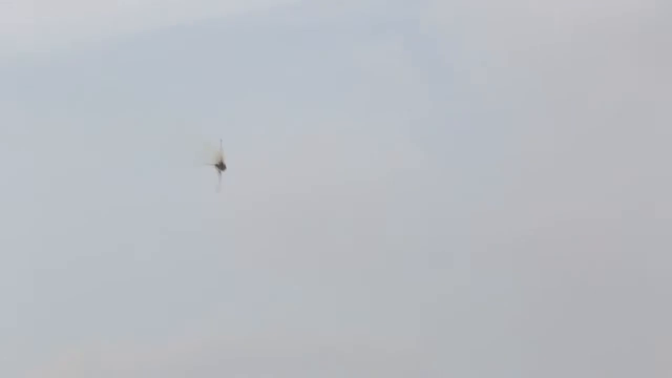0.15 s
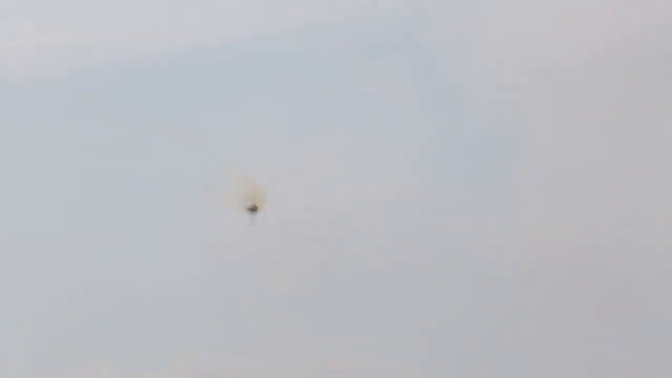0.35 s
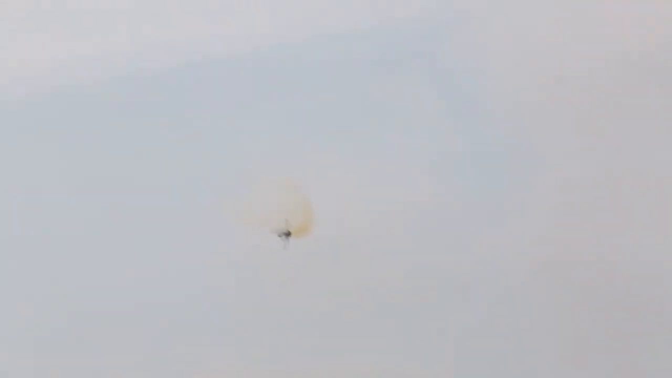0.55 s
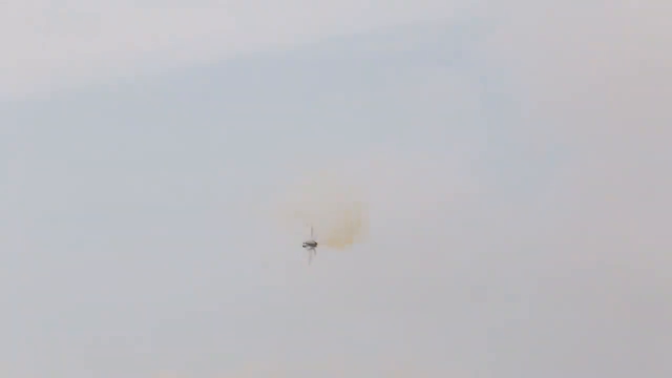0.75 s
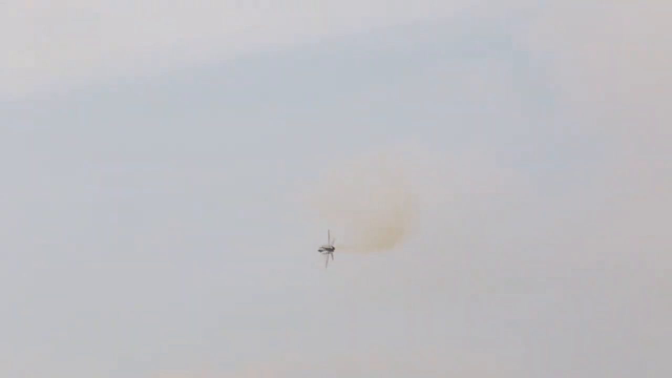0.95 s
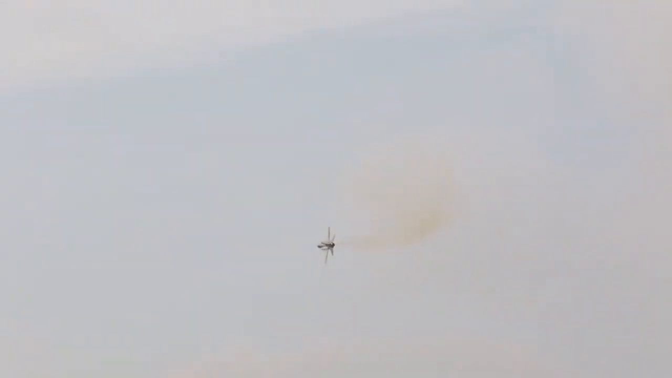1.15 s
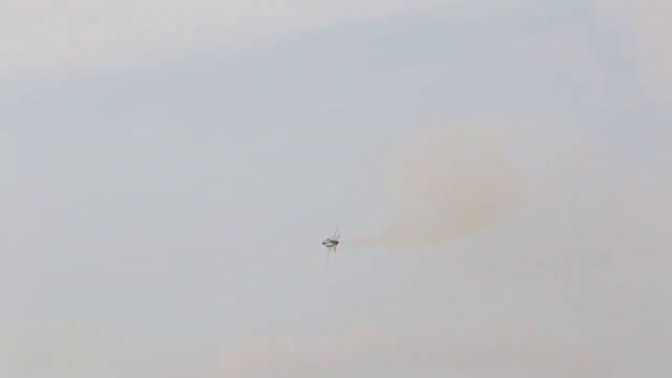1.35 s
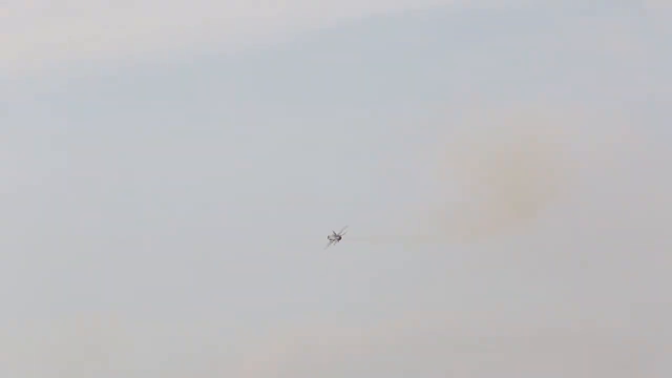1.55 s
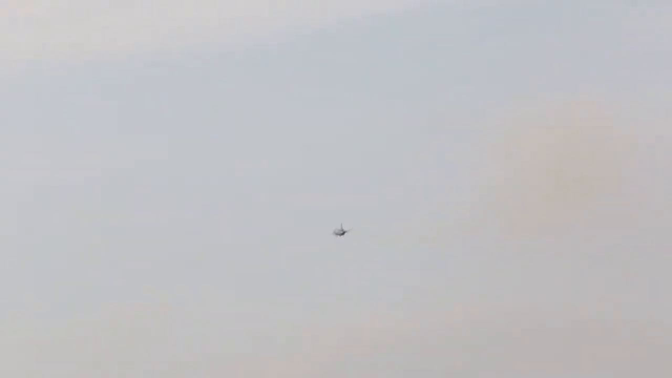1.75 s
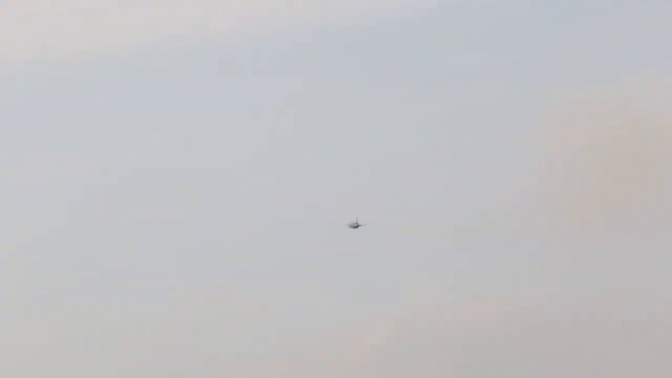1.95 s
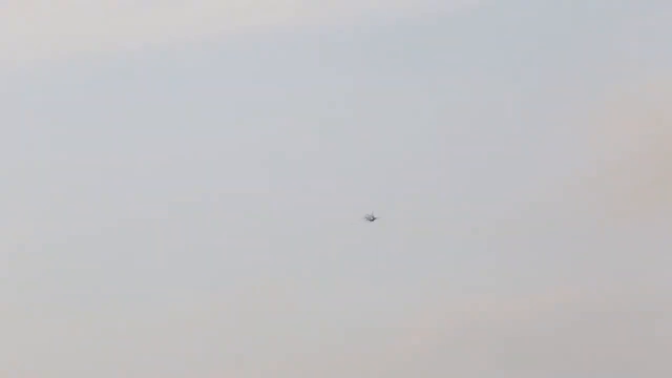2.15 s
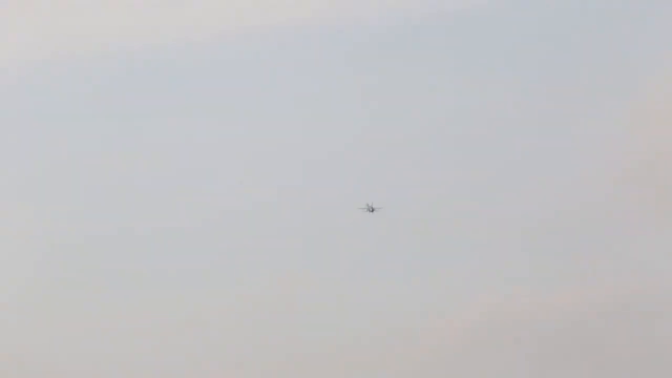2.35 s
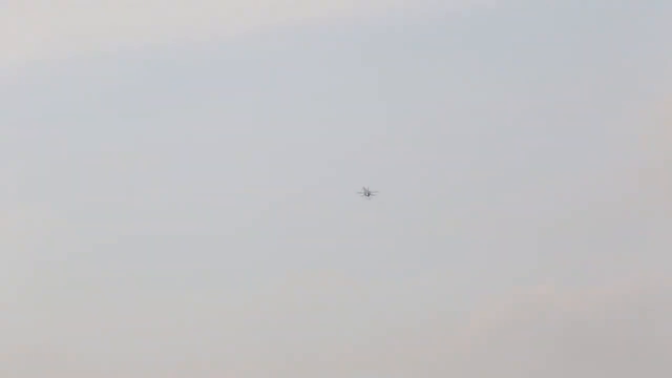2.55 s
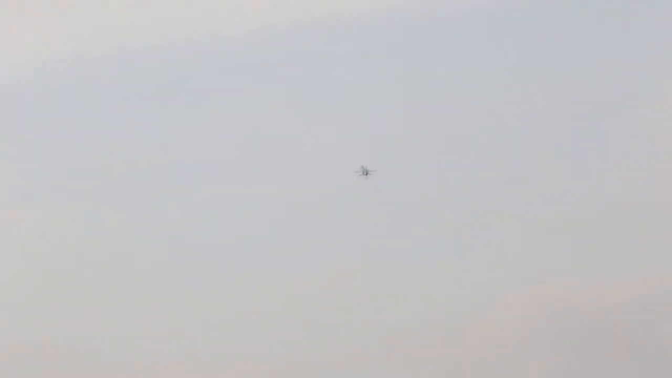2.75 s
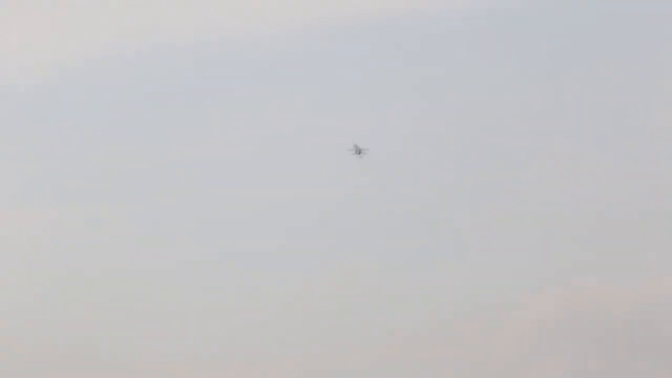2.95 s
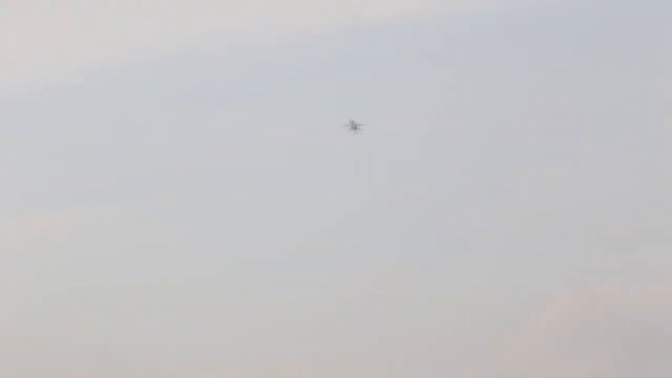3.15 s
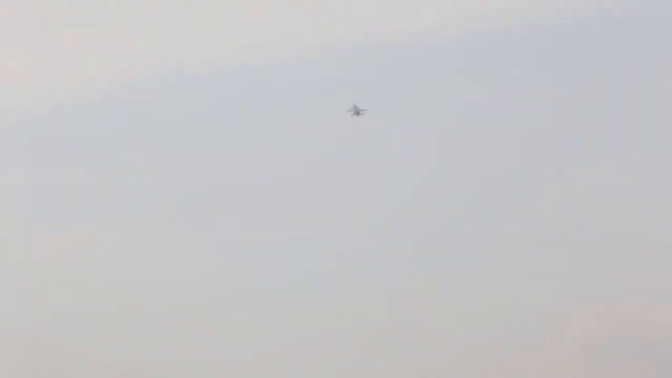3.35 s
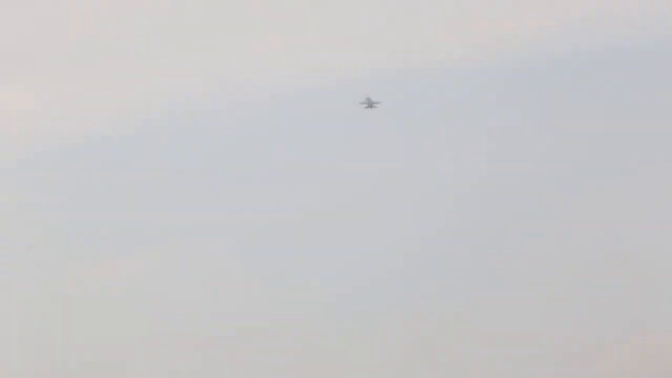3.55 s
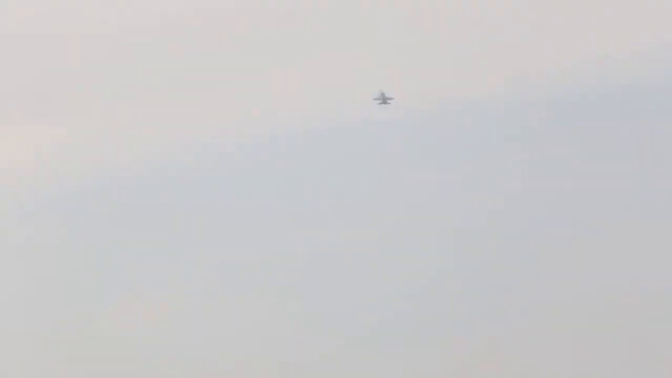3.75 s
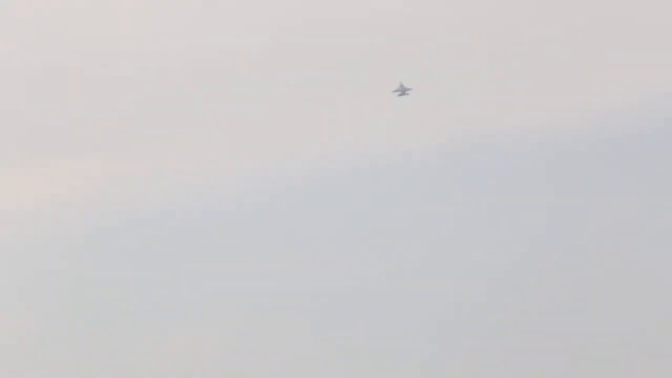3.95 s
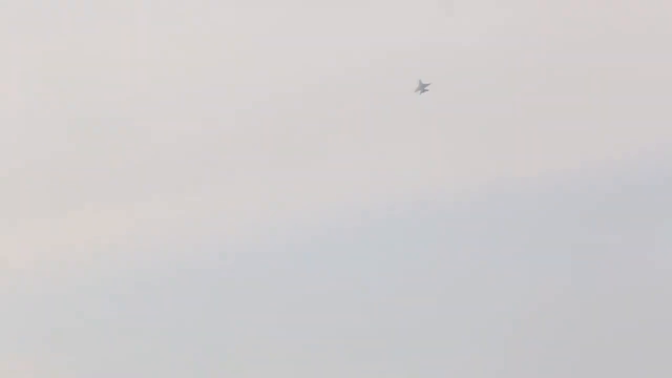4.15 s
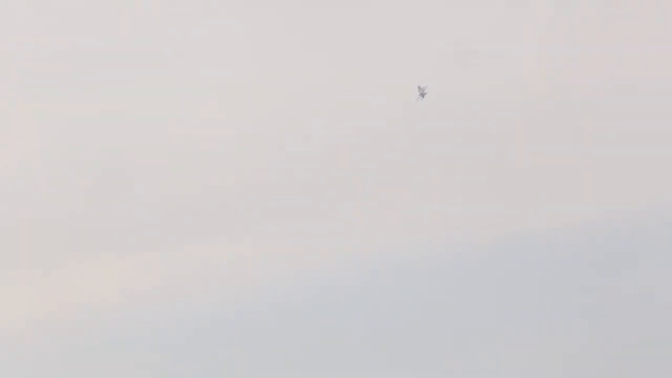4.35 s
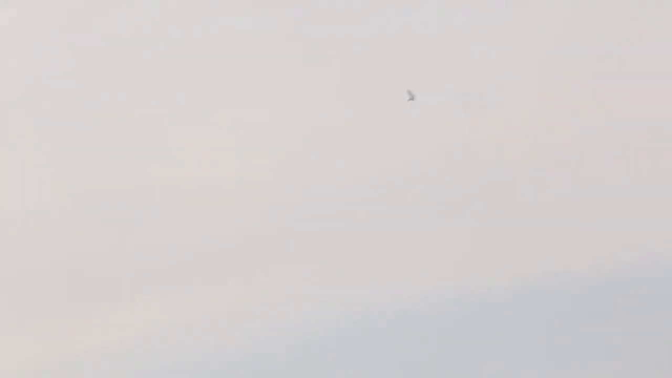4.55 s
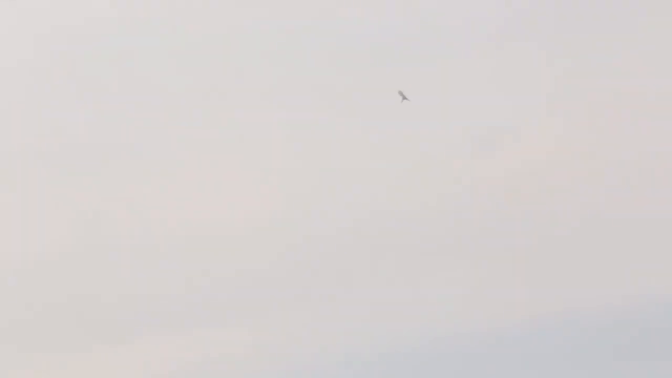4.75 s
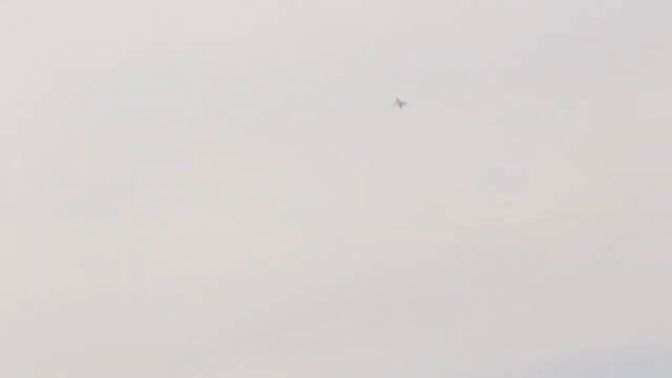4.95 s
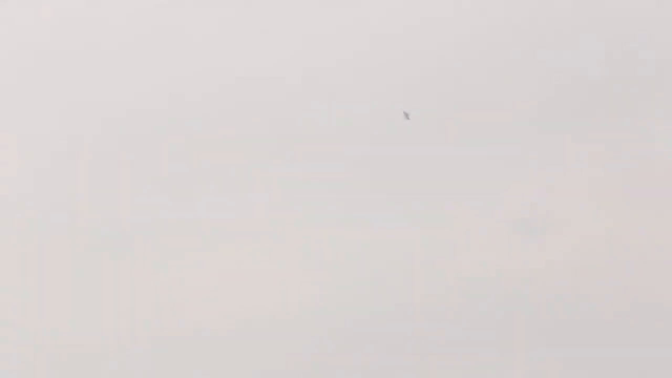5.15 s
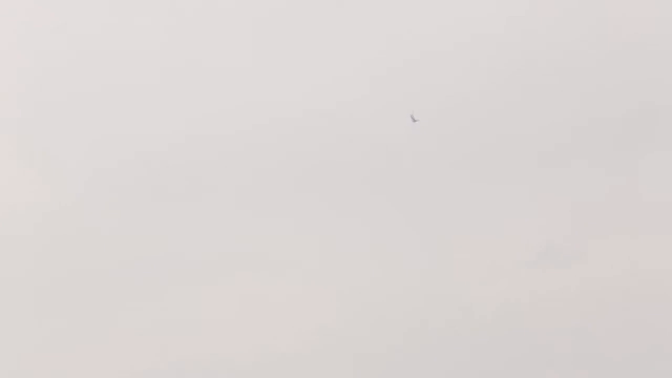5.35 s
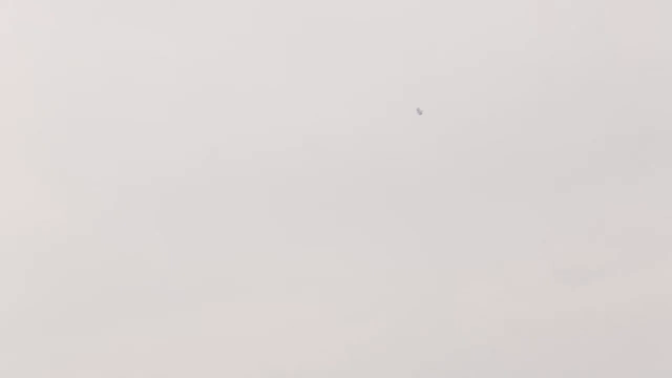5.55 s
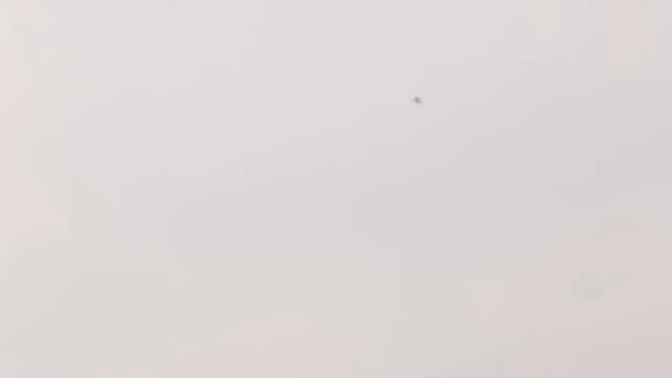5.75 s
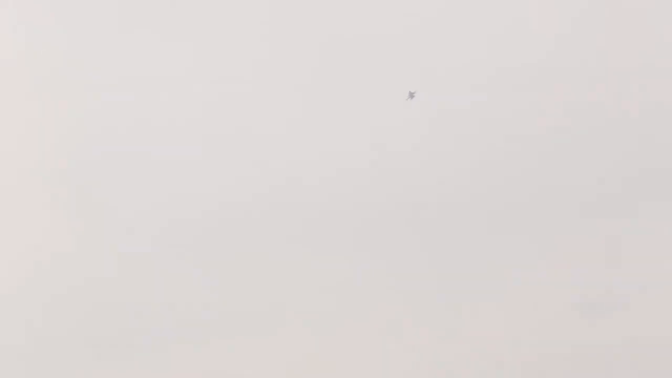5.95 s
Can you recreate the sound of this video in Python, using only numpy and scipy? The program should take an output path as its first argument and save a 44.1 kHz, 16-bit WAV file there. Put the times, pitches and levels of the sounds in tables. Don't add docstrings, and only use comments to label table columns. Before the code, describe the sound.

Just after a low pass, a jet's harsh exhaust roar snaps and crackles, dulls with distance, surges once more and sinks to rumble.

```python
import sys
import numpy as np
from scipy import signal
from scipy.fft import irfft
from scipy.io import wavfile

SR = 44100
rng = np.random.default_rng(int(sys.argv[2]) if len(sys.argv) > 2 else 0)


def int16_out(signal):
    q = np.round(np.clip(np.atleast_2d(signal).T, -1, 1) * 32767)
    wavfile.write(sys.argv[1], SR, q.astype(np.int16))


def natural_amplitude(level_db):
    exponent = np.asarray(level_db, float) / 20
    return 10 ** exponent


N = 264600


def in_time(rows, s):
    at, *columns = np.transpose(rows)
    return [np.interp(s, at, column) for column in columns]


def at_hz(points, hz):
    point_hz, point_db = np.array(points).T
    return np.interp(np.log(hz + 1), np.log(point_hz), point_db)


def drift(rate_hz, s):
    knots = np.arange(-1, N / SR * rate_hz + 2) / rate_hz
    return 1.2 * np.interp(s, knots, rng.standard_normal(len(knots)))


def shaped_noise(gain_of_frame, size=1024):
    steps = dict(fs=SR, nperseg=size, noverlap=size * 3 // 4)
    hz, s, frames = signal.stft(rng.standard_normal(N + size), **steps)
    return signal.istft(frames * gain_of_frame(hz[:, None], s[None]), **steps)[1][:N]


def unit(gain, hz, low_hz, high_hz):
    inside = (hz >= low_hz) & (hz < high_hz)
    return gain / np.sqrt(np.sum(gain ** 2 * inside, axis=0) / len(hz))


# time_s [s], loss_at_4khz_db [dB]
AIR_LOSS = [(0, 8), (.4, 8.5), (.6, 12), (1, 13), (1.44, 20), (1.54, 19), (2, 21), (2.5, 23.5), (3, 29.5),
            (3.5, 28), (3.9, 23), (4.2, 22.5), (4.5, 33), (5, 28), (5.5, 38), (6, 31)]


def air_loss_db(s):
    return in_time(AIR_LOSS, s)[0]


def air(hz, loss_db, power):
    return natural_amplitude(-np.clip(loss_db, 0, 200) * (hz / 4000) ** power)


# time_s [s], lag_ms [ms]
ECHO_LAG = [(0, 1.736), (.5, 1.586), (1, 1.494), (1.5, 1.37), (2.3, 1.31), (3.4, 1.22), (4.2, 1.14),
            (4.7, 1.103), (6, 1.1)]


def echo_lag_ms(s):
    return in_time(ECHO_LAG, s)[0]


def echo_share(s):
    grazing_ms, share_per_ms = 1.204, 0.65
    return 0.36 + share_per_ms * (echo_lag_ms(s) - grazing_ms)


def ground(hz, s, share, grass_hz):
    share = np.clip(share, 0, 1) / (1 + (hz / grass_hz) ** 2)
    echo = share * np.exp(-2j * np.pi * hz * echo_lag_ms(s) / 1000)
    return (1 + echo) / np.sqrt(1 + share ** 2)


# start_s [s], length_s [s], middling_front_peak_db [dB]
VOLLEYS = [(0, 0.19, -2.5), (.2, 0.093, -4), (0.298, 0.082, -4.5), (0.407, 0.055, -11), (0.532, 0.026, -6),
           (0.626, 0.071, -13.5), (.72, 0.22, -22.5), (0.98, 0.075, -18.5), (1.219, 0.27, -27),
           (3.521, 0.13, -30), (3.66, 0.063, -29.5), (3.73, 0.12, -25.5), (3.875, 0.12, -21.5),
           (3.978, .12, -18.5), (4.138, 0.086, -23), (4.22, 0.077, -26.5), (4.352, 0.053, -29),
           (4.429, 0.15, -31.5), (4.629, 0.164, -28.5), (4.829, .16, -34), (5.261, 0.069, -31.5)]


def in_volley(s):
    edge_s = 0.027
    start, length, _ = np.transpose(VOLLEYS)[:, :, None]
    to_nearest_end = np.minimum(s.ravel() - start, start + length - s.ravel())
    return np.clip(to_nearest_end / edge_s + .5, 0, 1).max(axis=0).reshape(s.shape)


def volley_fronts():
    gap_s, spread_db = .0055, 4.0
    start, length, middling_db = np.transpose(VOLLEYS)[:, :, None]
    gaps = rng.uniform(.4, 1.6, (len(VOLLEYS), 40))
    peak_chance, sharp_chance = np.minimum(rng.standard_normal((2, len(VOLLEYS), 40)), 1.3)
    s = start + gap_s * (np.cumsum(gaps, axis=1) - gaps[:, :1] / 2)
    fringe_db = 7.5 * (1 - in_volley(s))
    peak_db = middling_db + spread_db * peak_chance - fringe_db
    sharp_db = -1.05 * air_loss_db(s) - 1.5 + 5.0 * sharp_chance - fringe_db
    return np.stack([s, peak_db, sharp_db], axis=-1)[s < start + length]


# pitch_hz [Hz], level_db [dB per Hz]
HISS_COLOUR = [(3000, -1.5), (8000, 4.5), (11500, -7), (12500, -15.5), (21000, -15)]


def preamp_hiss():
    def gain(hz, s):
        colour = natural_amplitude(at_hz(HISS_COLOUR, hz)) + 0 * s
        return natural_amplitude(-92.0) * unit(colour, hz, 6000, 21000)
    return shaped_noise(gain)


# time_s [s], peak_db [dB]
TICKS = [
    (1.1294, -59),
    (2.1844, -60),
    (2.2119, -57),
    (2.2594, -67),
    (4.9494, -68),
    (4.9736, -58),
]


def handling():
    envelope, t = np.zeros(N), np.arange(N) / SR
    for s, peak_db in TICKS:
        envelope += natural_amplitude(peak_db - 3.0) * (t >= s) * np.exp(-np.abs(t - s) / .007)
    bright = signal.butter(2, [4800, 8000], "band", fs=SR, output="sos")
    return signal.sosfilt(bright, envelope * rng.standard_normal(N))


# pitch_hz [Hz], level_db [dB per Hz]
RUMBLE_SIDE = [(8.8, -53), (15, -31), (38, -16), (151, 3), (204, 3.5), (250, -9), (327, -11), (380, -19),
               (490, -43.5), (840, -120)]
# pitch_hz [Hz], level_db [dB per Hz]
RUMBLE_BEHIND = [(8.8, -66), (15, -36), (54, -34.5), (85, -15), (171, 0.5), (289, 3.5), (413, -15.5),
                 (450, -7), (580, -43), (990, -120)]
# time_s [s], level_db [dB], nozzle_turned_this_way [0-1]
PLUME = [(0, -23, .2), (.45, -19.5, 0), (.7, -23, .1), (.87, -28, 0), (1.19, -26, 0), (1.62, -32.5, 0.2),
         (2.4, -40, 0.07), (2.67, -35.5, 0.9), (3.02, -36.5, 0.74), (3.2, -33.5, 1), (3.64, -21, 1),
         (3.9, -23, 1), (4.3, -23, 0.74), (4.7, -25, .9), (5.2, -27, 0.5), (5.6, -28, 0.6), (5.8, -28, 0.4),
         (6, -36, .2)]


def rumble(hz, s):
    rumble_db, turned = in_time(PLUME, s)
    turned = np.clip(turned, 0, 1)
    colour = natural_amplitude((1 - turned) * at_hz(RUMBLE_SIDE, hz) + turned * at_hz(RUMBLE_BEHIND, hz))
    return natural_amplitude(rumble_db - 3.5 + drift(12, s)) * unit(colour, hz, 40, 330)


# time_s [s], level_db [dB]
JET = [(0, -8.5), (.3, -12.5), (.6, -17), (.87, -22.5), (1.05, -21.5), (1.43, -23.5), (1.53, -28),
       (1.72, -30.5), (2.1, -29.5), (3.18, -28), (3.85, -25.5), (3.9, -20.5), (4.34, -26), (4.7, -26.5),
       (5.08, -33), (5.36, -30.5), (5.6, -37.5), (6, -36)]
# pitch_hz [Hz], level_db [dB per Hz]
ROAR = [(100, -31.5), (250, -8), (400, 1), (700, 2.5), (1200, -2.5), (2000, -5), (4000, -18), (8000, -22),
        (16000, -30)]


def roar(hz, s):
    roar_db = in_time(JET, s)[0] - 1.5 * in_volley(s)
    colour = natural_amplitude(at_hz(ROAR, hz)) * air(hz, air_loss_db(s), 1.77)
    flicker_db = 0.83 * drift(13, s) + 0.52 * drift(25, s) * np.log2(1 + hz / 1500)
    share = echo_share(s) + 0.18 * drift(6, s)
    level = natural_amplitude(roar_db - 2.0 + flicker_db)
    return level * unit(colour, hz, 350, 1900) * ground(hz, s, share, grass_hz=2600)


def shocks(s, peak_db, loss_db, power, relax_ms, share, low_hz, high_hz):
    size, lead = 512, 128
    hz = np.fft.rfftfreq(size, 1 / SR)[:, None]
    jw = 2j * np.pi * hz
    front = -1 / (1 + jw * relax_ms / 1000) * jw / (jw + 2 * np.pi * 260)
    front = front * air(hz, loss_db, power)
    front = front * jw / (jw + 2 * np.pi * 110)
    inside = (hz > low_hz) & (hz < high_hz)
    front = front / (2 * np.sum(np.abs(front) * inside, axis=0) / size)
    centred = np.exp(-jw * lead / SR)
    heard = front * ground(hz, s[None], share, grass_hz=9000) * centred
    pulses = irfft(heard, size, axis=0) * natural_amplitude(peak_db)
    out = np.zeros(N + 2 * size)
    places = (s * SR).astype(int) + np.arange(size)[:, None] + size - lead
    np.add.at(out, places, pulses)
    return out[size:size + N]


def crackle(per_s, spread_db):
    tries = 6000
    time_draw, keep_draw, size_draw, relax_draw = rng.random((tries, 4)).T
    s = time_draw * N / SR
    keep = keep_draw < per_s * N / SR / tries * natural_amplitude(3.0 * drift(30, s))
    s = s[keep]
    size_db = spread_db * np.minimum(-np.log(size_draw[keep] + 1e-9), 2.2)
    air_db, volley = air_loss_db(s), in_volley(s)
    crackle_db = 3.0 + 1.094 * in_time(JET, s)[0] - 0.39 * air_db + 4.5 * volley
    loss_db = 1.4 * air_db - 4.0 - 1.96 * volley - 0.57 * size_db
    relax_ms = 0.13 + 0.11 * relax_draw[keep]
    peak_db = crackle_db + size_db - 9.0
    return shocks(s, peak_db, loss_db, 1.82, relax_ms, echo_share(s) + 0.26, 1500, 4000)


# time_s [s], peak_db [dB], sharpness_db [dB]
SHOCKS_LEAVING = [(0.0438, 3.5, -4), (0.0541, 4.5, -5), (0.0617, 6.5, -15), (0.105, 5, -6), (0.1322, 2, 4),
                  (0.143, 4.5, 1.5), (0.173, 2.5, 5), (0.2073, 2.5, -14), (0.2554, 2.5, -4),
                  (0.301, -3, -2), (0.3103, -1.5, -3), (0.332, -1, -6), (0.3485, 1, -3), (0.3716, -3.5, -4),
                  (0.4092, -4, -11), (0.4482, -5.5, -3.5), (0.469, -1.5, -9.5), (0.4796, -10, -6.5),
                  (0.5201, -10, -13), (0.5421, -6, -7), (0.6405, -1.5, -6), (0.6644, -9.5, -8.5),
                  (0.6788, -16, -9), (0.7232, -11.5, -14), (0.7617, -14, -11.5), (0.8055, -9.5, -17),
                  (0.8926, -20, -12), (0.9992, -10.5, -12.5), (1.0977, -13, -15.5), (1.3144, -24, -23)]
# time_s [s], peak_db [dB], sharpness_db [dB]
SHOCKS_BEHIND = [(3.322, -23.5, -43), (3.5568, -18.5, -23), (3.5971, -17.5, -26), (3.6223, -17, -24),
                 (3.6965, -18, -26), (3.763, -18, -24), (3.8252, -11, -24), (3.8941, -10.5, -29),
                 (3.901, -9.5, -20), (3.93, -9, -25), (3.9433, -25, -12), (3.9678, -13, -19),
                 (3.989, -13, -21), (4.003, -16, -20), (4.016, -11, -17.5), (4.0508, -11, -16.5),
                 (4.0742, -16, -17), (4.0964, -13.5, -21), (4.1428, -12, -20.5), (4.158, -15.5, -23),
                 (4.199, -19, -24.5), (4.355, -13, -22), (4.3676, -15.5, -23), (4.4013, -15.5, -25),
                 (4.499, -19, -37.5), (4.568, -22.5, -43), (4.651, -20.5, -28), (4.7167, -13.5, -20),
                 (4.865, -25.5, -24), (5.302, -28.5, -40)]


def strong_fronts(blunt, offset_db):
    s, peak_db, sharp_db = np.vstack([SHOCKS_LEAVING, SHOCKS_BEHIND, volley_fronts()]).T
    loss_db = np.maximum(-blunt * sharp_db + offset_db, 2.5)
    return shocks(s - .00005, peak_db, loss_db, power=1.4, relax_ms=0.34, share=.9, low_hz=1100, high_hz=9000)


def scene():
    exhaust = shaped_noise(rumble, size=4096) + shaped_noise(roar)
    fronts = crackle(per_s=700, spread_db=3.5) + strong_fronts(blunt=0.92, offset_db=-2.0)
    return (handling() + exhaust + fronts)[None]


def band_limit(x):
    return signal.sosfilt(signal.butter(12, 15690, fs=SR, output="sos"), x)


def record(dry):
    bent = dry - 0.38 * np.abs(dry) ** 3
    bent = signal.sosfilt(signal.butter(1, 18, "high", fs=SR, output="sos"), bent)
    top_cut = signal.cheby2(12, 60, 15800, fs=SR, output="sos")
    cut = signal.sosfilt(top_cut, np.clip(bent, -1.02, 1.02))
    fade = np.minimum((N - np.arange(N)) / (.003 * SR), 1)
    return band_limit(np.clip(cut + preamp_hiss(), -1, 1) * fade)


dry = scene()
out = record(dry)
int16_out(out)
```